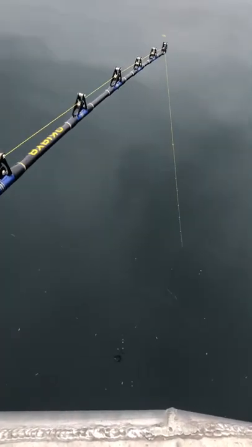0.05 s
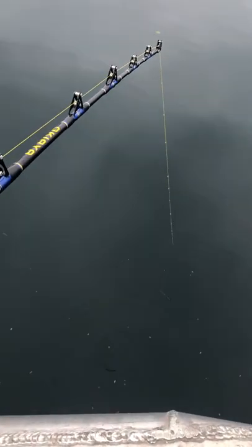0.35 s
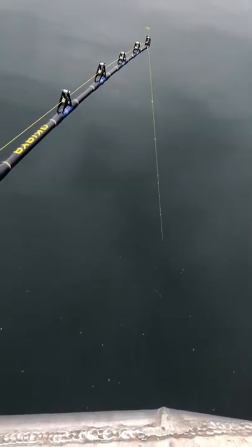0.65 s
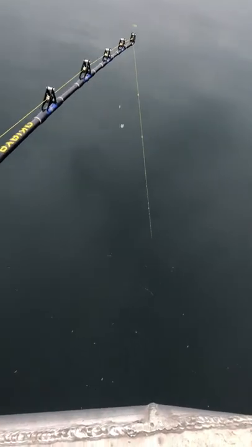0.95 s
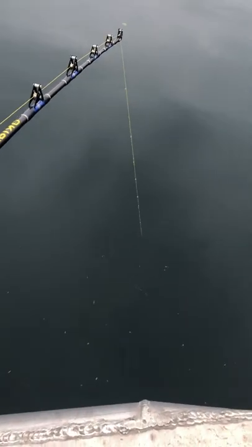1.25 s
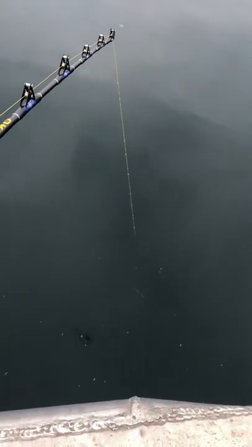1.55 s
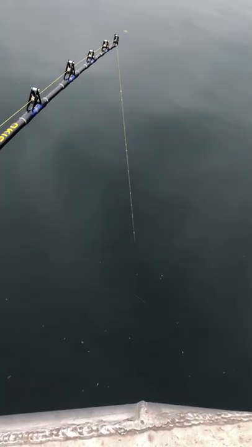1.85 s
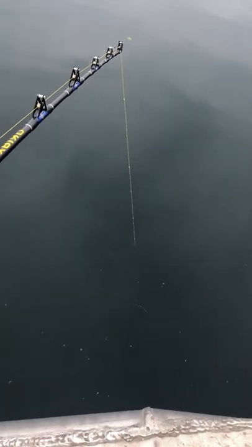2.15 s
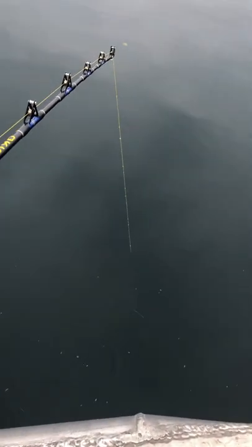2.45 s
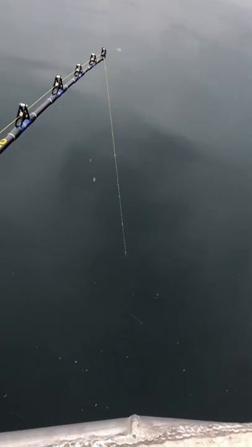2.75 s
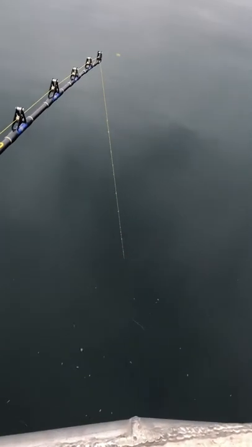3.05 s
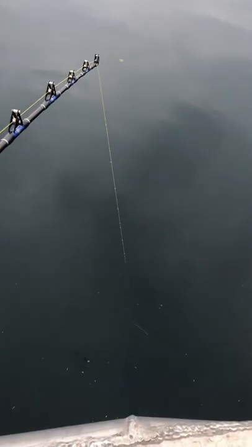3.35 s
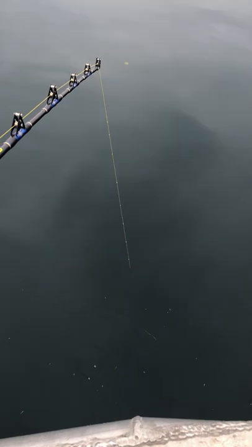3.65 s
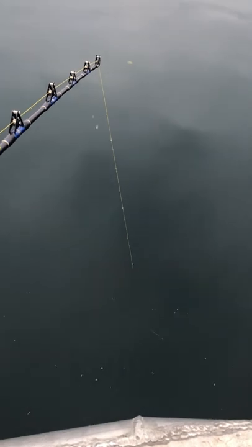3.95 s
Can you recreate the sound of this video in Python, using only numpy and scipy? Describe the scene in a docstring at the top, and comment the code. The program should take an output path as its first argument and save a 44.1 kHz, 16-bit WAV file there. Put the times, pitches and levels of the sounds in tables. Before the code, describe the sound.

An electric fishing reel winds in line with a steady, throbbing gear whine.

```python
"""On a boat in calm water, a mono microphone close to an electric fishing reel winding in line.
The reel picks up speed in the first half second, and the hull bumps softly. Then the speed holds:
a 31-tooth gear whines and throbs twice a turn as its load swings, the teeth rattle and rub in the
housing, wet line hisses onto the spool and the motor hums below. Around the middle the hull gives
two fainter low bumps, and the reel runs on to the end."""
import sys
import numpy as np
from scipy import signal
from scipy.fft import rfft, irfft
from scipy.io import wavfile
from scipy.ndimage import uniform_filter1d, map_coordinates

SR = 44100
rng = np.random.default_rng(int(sys.argv[2]) if len(sys.argv) > 2 else 0)


def transcribe(signal):
    """Save signal, clipped to [-1, 1], as a 16-bit WAV file at the path in sys.argv[1]."""
    frames = np.atleast_2d(signal).T
    limited = np.clip(frames, -1, 1)
    pcm = np.round(limited * 32767).astype(np.int16)
    wavfile.write(sys.argv[1], SR, pcm)


N = 176400

TEETH = 31
PULSE_HZ = 7  # uneven pulsing of the whine and the drone
TONE_POWER, FRICTION_POWER = 4, 2.9  # weak tones and friction grow with these powers of the speed


def gear_whine(turns):
    """Meshing teeth sound five harmonics that swell and bend with the load."""
    # Each row: time in seconds, then the level of mesh harmonics 1 to 5 in dB.
    levels = [(0, -46.5, -35, -40.5, -30, -43), (.28, -46, -41.5, -45, -30.5, -49),
              (.4, -43.5, -33.5, -40, -32, -55), (1.05, -40, -34.5, -39.5, -35, -43),
              (1.55, -41.5, -33, -41, -32, -42), (2.15, -40, -30.5, -38, -33, -43.5),
              (2.6, -42.5, -32, -41.5, -33.5, -43), (3.08, -38, -33.5, -39.5, -37, -40),
              (3.6, -40.5, -36.5, -39, -32, -41), (4, -44, -36.5, -36.5, -32, -41)]
    # Each row, one per harmonic: level swing in dB, phase swing in radians, lag in turns.
    throb = [(2.5, 0.4, 0.092), (2.5, 0.27, 0.07), (4.5, 0.44, -0.017), (4.5, 0.38, 0.02),
             (4.5, .45, -0.057)]
    whine = 0
    for k, (swing_db, bend_rad, lag) in enumerate(throb, 1):
        bend = bend_rad * np.sin(4 * np.pi * (turns - lag))
        phase = 2 * np.pi * k * TEETH * turns + bend + rng.uniform(0, 2 * np.pi)
        swell = undb(swing_db * load(turns - lag) + .66 * pulsing(PULSE_HZ))
        whine += undb(curve(levels, axis=k)) * swell / swell.mean() * np.sin(phase)
    return np.sqrt(2) * whine


def uneven_teeth(turns, pace):
    """Unevenly cut teeth add weaker, wavering tones that throb with the load."""
    # Each entry: a tone's frequency as a multiple of the shaft rate.
    orders = [35, 43, 44, 49, 50, 58, 60, 61, 67, 69, 74, 97, 108, 113, 114, 117, 118, 120, 121, 143, 150,
              168, 171, 174, 186, 207, 217, 219, 231, 234, 248, 250, 262, 279, 281, 310, 359]
    # Each entry: that tone's base level in dB at mean speed.
    levels = [-52.5, -50, -52.5, -56, -54, -59, -46, -55.5, -57.5, -51.5, -64, -64, -61, -56, -47, -43.5,
              -58, -45.5, -49, -60, -55, -67, -65, -51, -59, -57, -61, -57, -49, -56, -53, -53, -67, -50,
              -63, -58, -61]
    swell = pace ** TONE_POWER * unit(undb(1.5 * load(turns)))
    tones = 0
    for order, db in zip(orders, levels):
        tones += undb(db + 2.5 * walk(4.76)) * np.sin(2 * np.pi * (order * turns + rng.random()))
    return np.sqrt(2) * swell * tones


def load(turns, spool_per_shaft=1 / 4):
    """Tooth load: two unequal humps a turn, and a beat against the slower spool."""
    angle = 2 * np.pi * turns
    spool_angle = spool_per_shaft * angle
    humps = np.cos(2 * angle) + .22 * np.cos(angle) + .21 * np.sin(4 * angle)
    beat = np.cos(angle - spool_angle) + .5 * np.sin(angle + spool_angle)
    return humps + .25 * beat + .16 * walk(90)


def gear_rub(turns, rub_lag=.28, ring_lag=.085):
    """Teeth scrape in the housing and set the gear ringing at each hump of the load."""
    # The housing's colour. Each row: frequency in Hz, base level in dB per Hz.
    housing = [(300, -96.5), (700, -84.5), (1150, -82), (1400, -72.5), (1550, -68.5), (1660, -73.5),
               (1820, -68), (2120, -69), (2300, -70.5), (2600, -67), (2880, -69), (3150, -76), (3500, -78),
               (3900, -70), (4250, -76.5), (5500, -73), (6500, -70), (7100, -80), (15000, -91)]
    # The gear's bright ring. Each row: frequency in Hz, base level in dB per Hz.
    resonance = [(3800, -91), (4400, -76.5), (4750, -64.5), (5250, -63.5), (5600, -80.5), (6500, -86)]
    tooth_db = 2 * np.cos(2 * np.pi * TEETH * turns)
    rub = surface(turns, repeat_db=-8) * undb(load(turns - rub_lag) + tooth_db)
    ring = surface(turns, repeat_db=-8) * undb(4 * load(turns - ring_lag))
    rub = patchy(rub, depth_db=1.62)
    return undb(.32) * colour(unit(rub), housing) + undb(-.5) * colour(unit(ring), resonance)


def surface(turns, repeat_db, size=1056):
    """Friction noise; part of it comes back with every turn of the shaft."""
    marks = map_coordinates(rng.standard_normal(size), [turns % 1 * size], mode="grid-wrap")
    return unit(rng.standard_normal(N) + undb(repeat_db) * marks)


def line_hiss(turns, spurt_hz=9):
    """Wet line runs through the guides onto the spool in uneven spurts."""
    # The line's hiss. Each row: frequency in Hz, base level in dB per Hz.
    spectrum = [(3000, -100.5), (6000, -75.5), (6900, -75), (7700, -74), (8100, -75.5), (9000, -72.5),
                (9330, -75.5), (9650, -72.5), (10200, -72.5), (11000, -71.5), (11400, -77.5), (11700, -71),
                (12700, -79), (13200, -71.5), (13500, -81), (14300, -80), (14900, -76), (15400, -79),
                (16000, -79)]
    flicker = undb(.94 * pulsing(spurt_hz) + .16 * load(turns))
    hiss = patchy(surface(turns, repeat_db=-13), depth_db=2.5)
    return undb(-.25) * colour(unit(hiss * flicker), spectrum)


def motor(turns, pace, rotor_per_shaft=6.263):
    """The rotor hums cleanly; the drive train adds a low, pulsing drone."""
    # Each row: time in seconds, then the base level of rotor harmonics 1 to 3 in dB.
    hum_levels = [(0, -65, -55, -66), (.15, -62, -49, -55), (.22, -60, -62, -62), (.6, -53.5, -59, -69),
                  (2, -53, -57.5, -61.5), (4, -51.5, -54, -65)]
    # Each row: a drive-train tone as a multiple of the shaft rate, base level in dB.
    drone_tones = [(2, -67.5), (4, -65), (11, -61), (24.8, -59.5), (27, -61.5)]
    hum = drone = 0
    for k in (1, 2, 3):
        gain = undb(curve(hum_levels, axis=k) + walk(12))
        hum += gain * np.sin(2 * np.pi * (k * rotor_per_shaft * turns + rng.random()))
    for order, db in drone_tones:
        gain = undb(db + 3.5 * pulsing(PULSE_HZ))
        drone += gain * np.sin(2 * np.pi * order * turns + .63 * walk(12))
    return np.sqrt(2) * (hum + pace ** TONE_POWER * drone)


def boat(attack_s=.015):
    """Calm water murmurs against the hull, which bumps softly now and then."""
    # The water's murmur. Each row: frequency in Hz, base level in dB per Hz.
    murmur = [(20, -128), (38, -112), (50, -100), (65, -88), (100, -91.5), (150, -79), (200, -83.5),
              (300, -83.5), (400, -86.5), (490, -78.5), (590, -89.5), (750, -87), (2000, -100)]
    # Each row: a bump's start in seconds, level in dB, decay time in seconds.
    bumps = [(.15, -44, 0.12), (1.57, -49, .05), (2.26, -57, .04)]
    # The hull's colour. Each row: frequency in Hz, relative level in dB.
    hull = [(25, -60), (55, -22), (90, -10), (130, -1), (170, -3), (220, -20), (310, 0), (370, -18),
            (900, -35)]
    t = np.arange(N) / SR
    water = colour(rng.standard_normal(N), murmur) * undb(2.1 * walk(6.06))
    push = 0
    for start, db, decay in bumps:
        rise = np.clip((t - start) / attack_s, 0, 1)
        fall = np.exp(-np.maximum(t - start - attack_s, 0) / decay)
        push += undb(db) * rise * fall
    return water + push * unit(colour(rng.standard_normal(N), hull))


def undb(db):
    """Decibels to gain."""
    return 10 ** (np.asarray(db) / 20)


def unit(x):
    """Scale to an rms of one."""
    return x / np.sqrt(np.mean(x ** 2))


def curve(table, axis=1):
    """One column of a table, joined by straight lines in time."""
    rows = np.array(table, float)
    return np.interp(np.arange(N) / SR, rows[:, 0], rows[:, axis])


def walk(rate):
    """Smooth random drift of rms one, changing about rate times a second."""
    hold = max(int(SR / rate), 2)
    steps = np.repeat(rng.standard_normal(N // hold + 1), hold)
    return unit(uniform_filter1d(uniform_filter1d(steps, hold), hold)[:N])


def pulsing(hz):
    """An uneven swell that comes about hz times a second."""
    phase = 2 * np.pi * hz * np.arange(N) / SR + 1.44 * walk(14)
    return unit(np.sin(phase) + .5 * walk(40))


def colour(x, points):
    """Give white sound of rms one a spectrum of (Hz, dB per Hz) points."""
    hz, db = np.array(points, float).T
    bins_hz = np.maximum(np.arange(N // 2 + 1) * SR / N, 1)
    gain = undb(np.interp(np.log(bins_hz), np.log(hz), db))
    return irfft(rfft(x) * gain * np.sqrt(SR / 2), N)


def patchy(x, depth_db, count=24):
    """Let overlapping bands swell and fade, each on its own."""
    place, spectrum = np.linspace(0, count - 1, N // 2 + 1), rfft(x)
    mix = 0
    for k in range(count):
        band = irfft(spectrum * np.maximum(1 - abs(place - k), 0), N)
        mix += band * undb(depth_db * (walk(1.9) + walk(20)) / np.sqrt(2))
    return mix


def scene():
    """One shaft drives all parts of the reel; the close microphone feeds both channels alike."""
    # The reel speeds up, then holds. Each row: time in seconds, tooth-mesh rate in Hz.
    speed = [(0, 1179), (.12, 1206), (.28, 1228), (.39, 1274), (.53, 1291), (.8, 1296), (1.14, 1303),
             (1.35, 1295), (1.76, 1285), (2.03, 1289), (2.4, 1287), (2.66, 1281), (2.85, 1290),
             (3.08, 1301), (3.4, 1294), (3.78, 1287), (4, 1288)]
    mesh_hz = curve(speed)
    pace = mesh_hz / mesh_hz.mean()
    flutter = 1 + .001 * walk(35)
    turns = np.cumsum(mesh_hz * flutter) / SR / TEETH
    friction = pace ** FRICTION_POWER * (gear_rub(turns) + line_hiss(turns))
    mono = gear_whine(turns) + uneven_teeth(turns, pace) + friction + motor(turns, pace) + boat()
    return np.array([mono, mono])


def record(dry):
    """The recorder cuts the top steeply."""
    top_hz = 15700
    return signal.sosfilt(signal.ellip(12, .1, 90, top_hz, fs=SR, output="sos"), dry)


dry = scene()
out = record(dry)
transcribe(out)
```